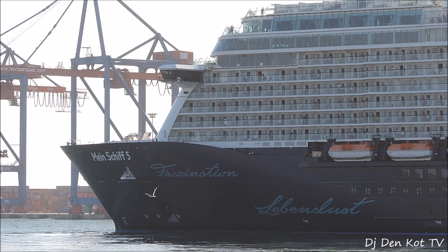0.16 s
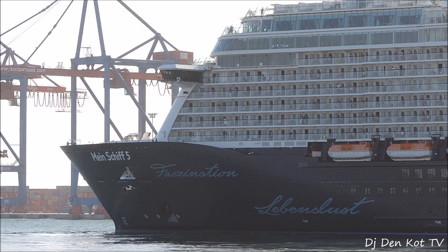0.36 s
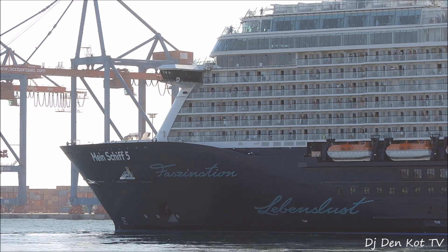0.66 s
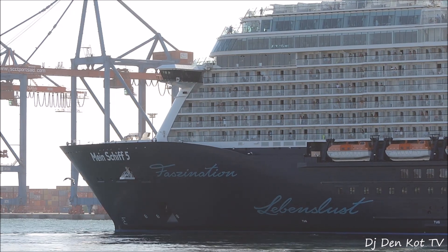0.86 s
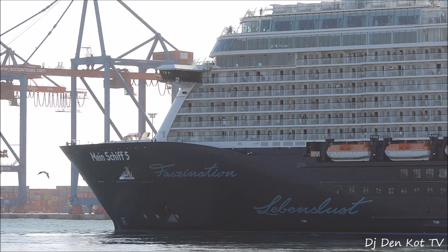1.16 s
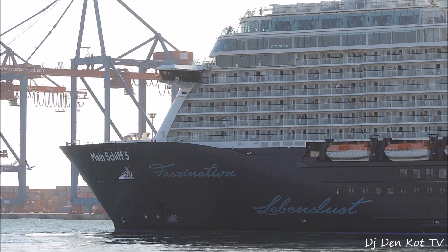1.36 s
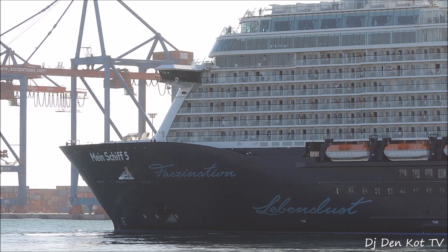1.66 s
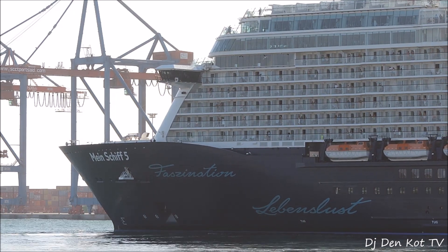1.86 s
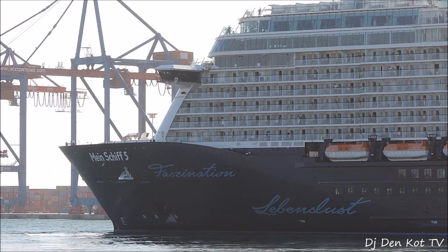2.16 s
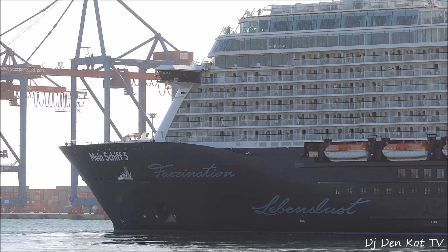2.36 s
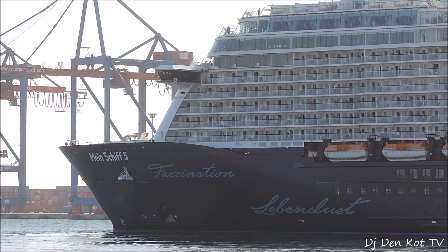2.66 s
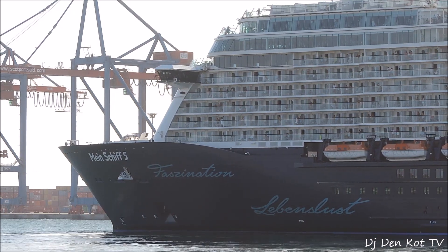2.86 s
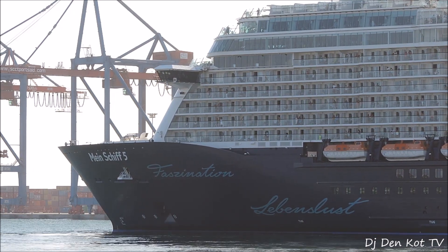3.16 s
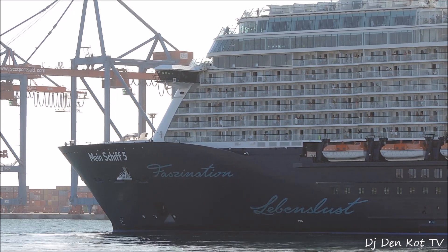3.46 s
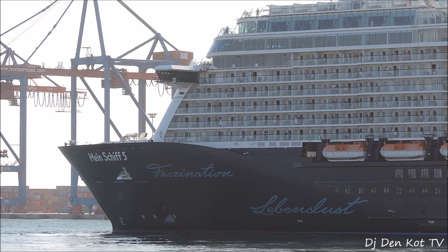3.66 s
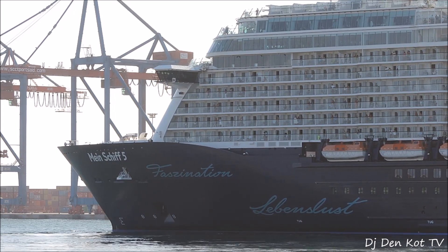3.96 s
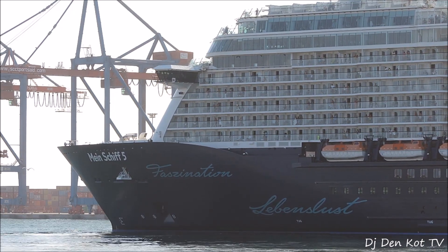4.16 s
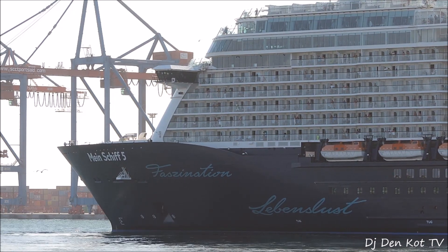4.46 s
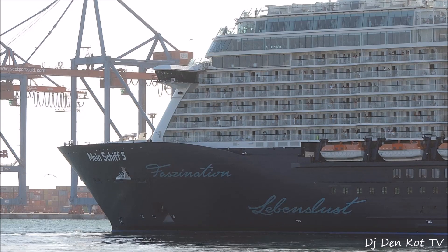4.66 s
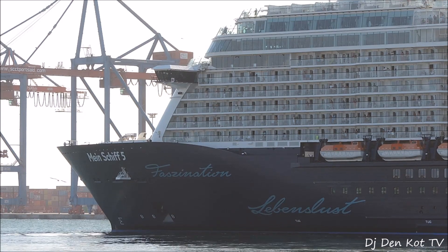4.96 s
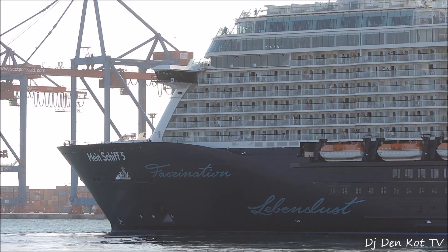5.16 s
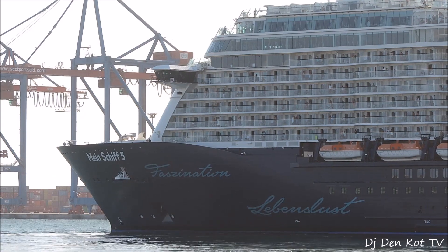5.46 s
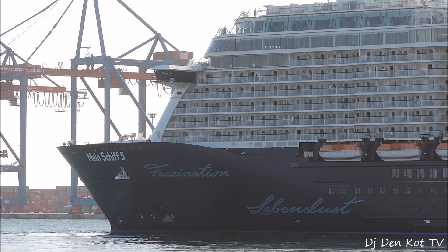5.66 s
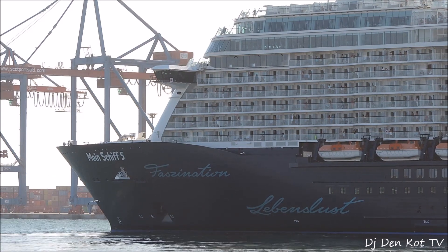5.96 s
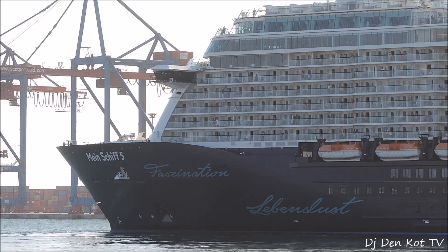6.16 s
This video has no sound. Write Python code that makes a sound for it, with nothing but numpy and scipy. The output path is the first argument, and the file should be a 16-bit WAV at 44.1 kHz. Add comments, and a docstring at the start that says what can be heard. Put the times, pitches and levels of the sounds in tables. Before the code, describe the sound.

Wind buffets the microphone as a ship's deep horn holds one long, swelling note over distant engines and lapping water.

```python
"""Across a harbour, a big ship sounds one long, deep horn blast with a roar of escaping air.
Echoes off the water and walls drift, so each tone in the blast swells and fades.
Wind puffs thump one microphone opening or the other, mostly the left. Water plops and splashes,
and something hollow is tapped three times. Behind it all, far engines drone and the water washes."""
import sys
import numpy as np
from scipy import signal
from scipy.fft import rfft, irfft, next_fast_len
from scipy.io import wavfile
from scipy.ndimage import uniform_filter1d, map_coordinates

SR = 44100
rng = np.random.default_rng(int(sys.argv[2]) if len(sys.argv) > 2 else 0)


def wav_out(sig):
    """Save sig, one row per channel (or a flat mono array), as 16-bit PCM at SR to the path in sys.argv[1]."""
    wavfile.write(sys.argv[1], SR, np.round(np.clip(np.atleast_2d(sig).T, -1, 1) * 32767).astype(np.int16))


N = 278712
PAD = 4096  # spare samples, so short sounds fit at the ends


def horn():
    """A metal disc slams once a cycle; three shifting echoes strengthen or cancel each tone it makes."""
    # Each row: time in seconds, level in dB.
    loudness = [(1.2, -34.5), (1.5, -34.5), (1.72, -29.5), (1.95, -30), (2.15, -30.5), (2.4, -30),
                (2.65, -34.5), (2.95, -34.0), (3.2, -30), (3.6, -29), (3.95, -30.5), (4.28, -28.5),
                (4.5, -31.5), (4.8, -35), (5.08, -32.5), (5.25, -34.5), (5.45, -33.5), (5.68, -30),
                (6.0, -30), (6.32, -31.1)]
    # Each row: time in seconds, pitch in Hz.
    tuning = [(1.1, 106.2), (1.75, 106.62), (2.4, 106.93), (3, 107.05), (4.25, 107.18), (5.5, 107.39),
              (6.32, 107.35)]
    # The level in dB of each of the seven tones, lowest first.
    tone_levels = [0.5, 0.44, -3.5, -2.5, -12.5, -14, -30]
    # How many dB louder each tone is on the left than on the right.
    tone_pans = [0.5, 0.5, 1.5, 0.9, 0.5, -0.5, -0.5]
    # Each row: time in seconds, extra path in metres of the echo off the heaving water.
    water_path = [(1.2, 2.92), (1.5, 2.86), (1.72, 2.93), (1.95, 2.9), (2.15, 2.84), (2.4, 2.79),
                  (2.65, 2.69), (2.95, 2.71), (3.2, 2.76), (3.6, 2.8), (3.95, 2.71), (4.28, 2.86),
                  (4.5, 2.82), (4.8, 2.88), (5.08, 2.84), (5.25, 2.85), (5.45, 2.91), (5.68, 2.97),
                  (6.0, 2.92), (6.32, 2.98)]
    # Each row: echo strength, extra path in metres, its change in metres a second as the ship moves.
    walls = [(-.31, 3.444, -.221), (-.19, 2.628, -.329)]
    (level_db,), (pitch,), (detour,) = curves(loudness), curves(tuning), curves(water_path)
    t = np.arange(N) / SR
    phase = 2 * np.pi * np.cumsum(pitch) / SR
    echoes = [(0.56, detour)] + [(strength, metres + change * t) for strength, metres, change in walls]
    tones = np.zeros((2, N))
    for k, (db, pan) in enumerate(zip(tone_levels, tone_pans), start=1):
        paths = 1 + sum(gain * np.exp(-2j * np.pi * k * pitch * metres / 343) for gain, metres in echoes)
        late = 0.23 * (k - 1) ** 2  # the flared bell spreads the pulse
        drift = 0.085 * k * wobble(2.3) + 0.033 * k * wobble(22)  # swirling air shakes the tone
        flutter_db = (0.72 + 0.077 * k) * wobble(18)
        apart = 0.087 * k * wobble(3.6) - 0.028 * k  # phase between left and right
        wave = np.exp(1j * (k * phase + late + drift))
        tone = np.sqrt(2) * amp(level_db + db + flutter_db) * paths * wave
        tones += np.real([tone * amp(side * pan / 2) * np.exp(.5j * side * apart) for side in (1, -1)])
    elapsed = t - 1.12  # seconds since the blast began
    air = escaping_air(level_db, phase)
    return np.clip(elapsed / 0.013, 0, 1) * tones + np.clip(elapsed / 1.06, 0, 1) * air


def escaping_air(horn_db, phase):
    """Air roars out through the horn's bell, pulsing once a cycle and partly following its swells."""
    # Each row: a pitch at which the bell rings in Hz, its width in Hz, level in dB.
    bell_rings = [(184, 104, 21.5), (580, 192, 11), (890, 110, 4), (1170, 120, -3.5), (1440, 75, -13.5),
                  (1900, 270, -18)]

    def bell(f):
        rings = sum(amp(db) * f * width / (hz * hz - f * f + 1j * f * width) for hz, width, db in bell_rings)
        return abs(rings) / (1 + (f / 1800) ** 3)

    pulse = 1 + 0.16 * np.cos(phase - 1)
    return amp(-36.5 + 0.73 * (horn_db - horn_db.mean())) * pulse * rush(bell, patchy_db=1)


def wind():
    """Each puff pushes on one microphone opening and leaves swirling air; a lumpy rumble fills the gaps."""
    # Each row: time in seconds, side (-1 left, 1 right), level in dB, length in ms, brightness in dB.
    strong_puffs = [(0.137, 1, -26, 15, -3.5), (0.294, 1, -18.5, 48, 5.5), (0.331, -1, -15, 19, -7),
                    (0.33, 1, -23.5, 5, 6), (0.357, 1, -19, 31, -0.5), (0.411, 1, -26.5, 28, 1),
                    (0.563, 1, -20.5, 21, 2), (0.655, 1, -25, 45, 6.5), (0.996, -1, -13, 18.7, 8),
                    (1.026, -1, -20, 28, -1.5), (1.163, -1, -10, 35, 2), (1.196, -1, -15, 41, 8),
                    (1.387, -1, -20.5, 26, -3), (1.444, -1, -23, 31, 15), (1.708, -1, -23.5, 32, 10),
                    (1.792, -1, -23, 18, -1), (1.889, -1, -10.5, 9.3, 18), (2.136, -1, -23, 43, -9),
                    (2.166, -1, -25, 9.9, 2), (2.207, -1, -20.5, 39, -1), (2.25, -1, -19.5, 15, -9),
                    (2.345, -1, -21, 39, -6.5), (2.569, -1, -15, 20, 15.5), (2.6, -1, -18, 17, -1),
                    (2.63, -1, -15, 20, 6), (2.643, -1, -16, 21, 13.5), (2.691, -1, -23, 12, 7),
                    (2.718, -1, -17.5, 26, 2), (2.822, -1, -21, 31, -1), (2.88, -1, -19.5, 30, -16),
                    (3.609, -1, -23.5, 24, -1), (3.681, -1, -22, 11, 10.5), (3.858, -1, -23, 58, 5),
                    (3.913, -1, -17, 23, 1.5), (4.258, -1, -21, 15, -4), (4.303, -1, -19, 65, 2.5),
                    (4.311, -1, -14.5, 15, -8), (4.388, -1, -11, 12, -6), (4.417, -1, -16.5, 13, 11),
                    (4.465, -1, -14.5, 20, 7), (4.503, -1, -14.5, 28, 10.5), (4.524, -1, -16.5, 27, -8.5),
                    (4.568, -1, -21.5, 53, 2.5), (4.59, -1, -17.5, 30, 4.5), (4.63, -1, -17.5, 21, 8),
                    (4.699, -1, -16, 54, 14.5), (4.732, -1, -12.5, 9.8, 0), (4.784, -1, -18.5, 19, 9),
                    (4.818, -1, -22, 19, 18), (5.078, -1, -12, 6, 12.5), (5.099, -1, -13.5, 56, 7),
                    (5.216, -1, -20.5, 9.3, 0.5), (5.545, 1, -19.5, 7.6, 12), (5.573, 1, -19.5, 26, 7.5),
                    (6.17, -1, -22, 15, -17), (6.222, -1, -21.5, 22, 1), (6.266, -1, -13.5, 6.6, -4.5)]
    # The slow, deep part of a puff. Each row: frequency in Hz, level in dB.
    thud = [(8, -29.5), (25, 13.5), (60, 6), (110, 5.5), (200, -17.5), (400, -77)]
    # The fast, brighter part. Each row: frequency in Hz, level in dB.
    flap = [(60, -13), (130, -7), (200, -0.5), (300, -7), (500, -22), (800, -33), (1300, -43), (3000, -81)]
    out = np.zeros((2, N + 2 * PAD))
    for s, side, db, ms, bright_db in strong_puffs + small_puffs():
        colour = lambda f: amp(along(thud, f)) + amp(along(flap, f) + bright_db)
        puff = burst(ms, colour, channels=1, push=26.5)
        sides_db = [[0], [-22]] if side < 0 else [[-22], [0]]
        add(out, amp(db) * puff * amp(sides_db), s)
    lumps = amp(2.0 * np.array([wobble(20), wobble(13)]))
    noise = rng.standard_normal((2, N))
    rumble = filtered(noise, lambda f: amp(along(thud, f)) + 1.7 * amp(along(flap, f)))
    return out[:, PAD:-PAD] + amp([[-43], [-45]]) * unit(lumps * rumble)


def small_puffs(gap_s=.05, typical_ms=22, right_share=.25):
    """The breeze scatters small puffs at random; gives rows like those of the strong puffs."""
    # Each row: time in seconds, puff level in dB.
    breeze = [(0, -27), (.4, -33), (.7, -46.5), (1.05, -26), (1.5, -39), (1.85, -18), (2.1, -35.5),
              (2.4, -26.5), (2.8, -28.5), (3, -46), (3.55, -37.5), (3.75, -26.5), (4.0, -32), (4.1, -43),
              (4.7, -23), (5.0, -36.5), (5.4, -26), (6.32, -25)]
    slots = np.arange(0, N / SR - gap_s, gap_s)
    when, side = rng.random((len(slots), 2)).T
    length, bright = rng.standard_normal((len(slots), 2)).T
    s = slots + when * gap_s
    db = np.interp(s, *np.transpose(breeze))
    return list(zip(s, side - (1 - right_share), db, typical_ms * np.exp(.4 * length), 5 * bright))


def knocks():
    """Something hollow nearby is tapped; where the tap lands sets which of its tones ring."""
    # Each row: start in seconds, level in dB, treble tilt in dB per octave, boost near 1400 Hz in dB.
    taps = [(4.74, -22.5, -16, 9), (5.202, -19.5, -9, -3.5), (5.338, -21, -11, -9)]
    # Each row: pitch in Hz, level in dB, seconds to fade by 60 dB.
    hollow_tones = [(803, -1, 0.014), (1055, -7.5, .04), (1370, -9.5, 0.063), (1630, -11, 0.036),
                    (2320, -14, 0.041), (2940, -17.5, 0.043)]
    out, t = np.zeros(N + PAD), np.arange(PAD) / SR
    hz, level_db, fade_s = np.transpose(hollow_tones)[..., None]
    attack = 1 - np.exp(-t / 0.00033)
    for s, db, tilt_db, middle_db in taps:
        middle = np.exp(-(3 * np.log2(hz / 1400)) ** 2)
        shape_db = level_db + tilt_db * np.log2(hz / 1000) + middle_db * middle
        ring = amp(shape_db - 60 * t / fade_s) * np.sin(2 * np.pi * hz * t)
        add(out, amp(db) * attack * ring.sum(axis=0), s)
    return out[:N]


def splashes():
    """Each slap of water is a short swell of noise: a narrow band plops, a wide one hisses."""
    # Each row: time in seconds, level in dB, length in ms, centre in Hz, width in octaves.
    slaps = [(.43, -57, 15, 2200, 0.42), (1.105, -48, 18, 1850, 0.43), (1.163, -57, 1.8, 4880, 0.69),
             (1.813, -39.5, 12, 1610, 0.28), (1.819, -56, 20, 2780, 0.59), (1.93, -64, 23, 7800, 1.3),
             (2.07, -59, 26, 3470, 0.86), (4.249, -59, 10, 9100, 0.99), (4.285, -66, 61, 7830, .8),
             (4.342, -56, 17, 3800, 0.14), (4.35, -63, 25, 7100, 1), (4.454, -57, 6.9, 8060, 0.83),
             (4.48, -41, 16, 1640, 0.083), (4.489, -63, 44, 4980, 0.91), (4.856, -50.5, 15, 3280, 0.16),
             (4.888, -52, 31, 10050, 3.4), (5.04, -47.5, 19, 1840, .1), (5.203, -56, 4.5, 2190, 0.62),
             (5.28, -61.5, 13, 3500, 0.42), (5.339, -56, 4, 3000, 0.68), (5.37, -62, 15, 5380, 0.37),
             (5.519, -68, 10, 10040, .4), (5.557, -35.5, 8.7, 1090, 0.19), (5.676, -59.5, 7.6, 4820, 0.42),
             (5.765, -39, 12, 1730, 0.16), (6.241, -61, 18, 8000, 1.2)]
    out = np.zeros((2, N + 2 * PAD))
    for s, db, ms, hz, octaves in slaps:
        band = lambda f: np.exp(-(np.log2((f + 1) / hz) / octaves) ** 2 / 2)
        mid, side = burst(ms, band, channels=2)
        add(out, amp(db) * (0.76 * mid + .4 * side * [[1], [-1]]), s)
    return out[:, PAD:-PAD]


def harbour():
    """Far engines and cranes drone and hum; the water's wash and fizz swell slowly."""
    # Each row: time in seconds, then the levels of wash, fizz and hum in dB.
    swells = [(0, -56.5, -66, -62), (.8, -54.5, -67.5, -53), (1.5, -57, -72, -62), (1.8, -48.5, -69.5, -56),
              (2.1, -47, -67, -47), (2.5, -60.5, -66.5, -57), (3.0, -61.5, -66.5, -48.5),
              (3.3, -64, -63.5, -47.5), (3.75, -52, -65, -50), (4.4, -51.5, -67.5, -49),
              (4.8, -60, -65.5, -45.5), (5.3, -57.5, -65.5, -52.5), (5.7, -51, -65.5, -44.5),
              (6.05, -58, -65, -60.5), (6.32, -44.5, -62, -63)]
    # The tone colours of three noises. Each row: frequency in Hz, level in dB.
    drone_colour = [(15, -2.5), (60, 7.5), (140, -1), (380, -1.5), (480, -6.5), (600, -9.5), (700, -6.5),
                    (850, -10.5), (1000, -15.5), (1150, -15), (1900, -27), (2250, -30.5), (2650, -38.5),
                    (3300, -36.5), (6000, -48)]
    wash_colour = [(700, -15.5), (1300, -2.5), (1800, -1.5), (2200, -9.5), (2450, -6), (2800, -9.5),
                   (3300, -17.5), (5000, -26), (9000, -34.5)]
    fizz_colour = [(1500, -20.5), (3500, 4.5), (5000, 1.5), (8000, -4), (14000, -9.5)]
    wash_db, fizz_db, hum_db = curves(swells)
    drone = amp(-40) * rush(lambda f: amp(along(drone_colour, f)), patchy_db=.8)
    hum_band = lambda f: 1 / (1 + ((f - 1090) / 70) ** 2)
    hum = amp(hum_db + 2.0 * wobble(7.8)) * rush(hum_band, patchy_db=2.5)
    wash = amp(wash_db + .8 * wobble(12)) * rush(lambda f: amp(along(wash_colour, f)), patchy_db=.8)
    fizz = amp(fizz_db + .7 * wobble(6.3)) * rush(lambda f: amp(along(fizz_colour, f)), patchy_db=2.5)
    return drone + hum + wash + fizz


def rush(colour, patchy_db, lag_samples=5):
    """Far stereo noise with random louder patches, a little late and soft on the left."""
    # Each row: frequency in Hz, how alike left and right are (1 means the same).
    likeness = [(60, .85), (300, 1), (520, 1), (900, 0.91), (1500, 0.79), (2600, 0.11), (8000, 0.17)]
    spectrum = signal.stft(rng.standard_normal((2, N)), nperseg=512)[2]
    patches = rng.standard_normal(spectrum.shape[1:])
    patches = uniform_filter1d(uniform_filter1d(patches, 6, axis=0), 10, axis=1)
    pair = signal.istft(spectrum * amp(patchy_db * unit(patches)), nperseg=512)[1][:, :N]
    spread = lambda hz: np.arccos(np.clip(along(likeness, hz), -1, 1)) / 2
    mid, side = filtered(pair, lambda hz: colour(hz) * [np.cos(spread(hz)), np.sin(spread(hz))])
    return unit(np.array([amp(-0.76) * np.roll(mid + side, lag_samples), mid - side]))


def burst(ms, colour, channels, push=0):
    """A swell of noise that rises faster than it falls; push adds one sharp kick at its top."""
    t = np.arange(-PAD, PAD) / SR
    swell = np.exp(-(np.where(t < 0, 2200, 900) * t / ms) ** 2)
    drive = rng.standard_normal((channels, len(t)))
    drive[:, PAD] = push * np.sign(drive[:, 0] + 0.82)
    x = swell * filtered(drive, colour)
    return x * np.linalg.norm(swell) / np.linalg.norm(x, axis=1, keepdims=True)


def amp(db):
    """Turns decibels into a gain."""
    return 10 ** (np.asarray(db) / 20)


def unit(x):
    """Scales a sound to an average power of 1."""
    return x / np.sqrt(np.mean(x ** 2) + 1e-20)


def along(points, hz):
    """Reads between (Hz, value) points, with octaves evenly spaced."""
    f, v = np.transpose(points)
    return np.interp(np.log(hz + 1), np.log(f + 1), v)


def curves(rows):
    """One value per sample for each column after the time."""
    s, *cols = np.transpose(rows)
    return [np.interp(np.arange(N) / SR, s, c) for c in cols]


def wobble(rate):
    """A smooth curve through `rate` random points a second."""
    return map_coordinates(rng.standard_normal(int(N * rate / SR) + 4), [np.arange(N) * rate / SR])


def filtered(x, response):
    """Scales each frequency in x by response(Hz)."""
    m = next_fast_len(x.shape[-1] + 2 * PAD)
    return irfft(rfft(x, m) * response(np.fft.rfftfreq(m, 1 / SR)), m)[..., :x.shape[-1]]


def add(track, x, s):
    """Mixes a short sound into a track, starting at s seconds."""
    track[..., round(s * SR):][..., :x.shape[-1]] += x


def scene():
    """All the harbour's sounds together, in stereo."""
    return horn() + wind() + knocks() + splashes() + harbour()


def record(dry):
    """The deepest bass is dropped, the hardest puffs are rounded off, and the highest treble is cut."""
    x = filtered(dry, lambda hz: hz ** 2 / (hz ** 2 + 22 ** 2))
    x = x / (1 + abs(x / .68) ** 6) ** (1 / 6)
    return filtered(x, lambda hz: hz < 13500)


dry = scene()
out = record(dry)
wav_out(out)
```